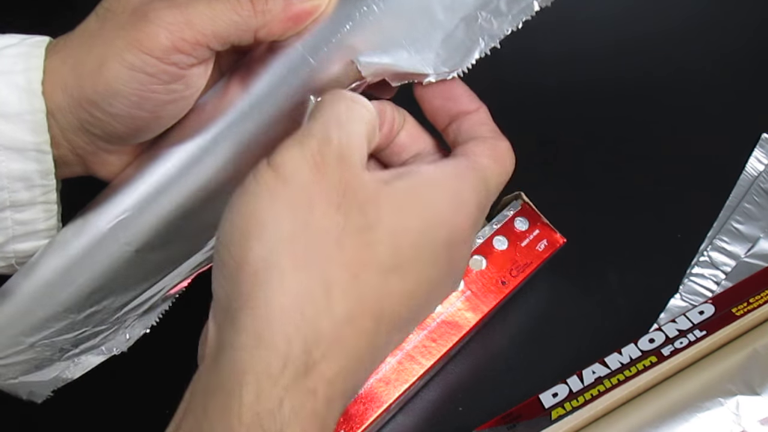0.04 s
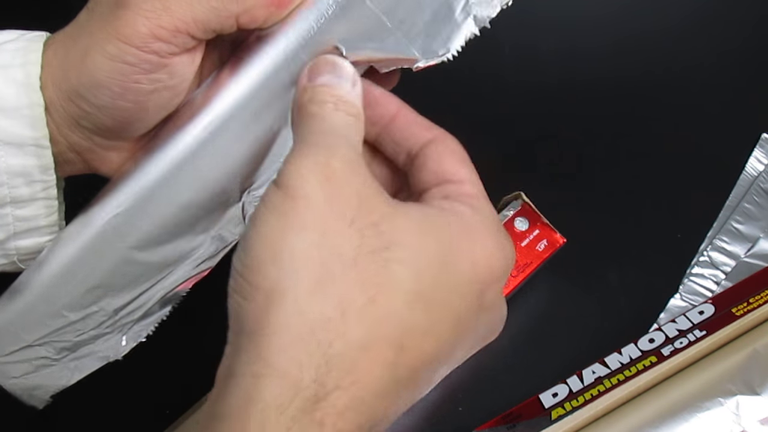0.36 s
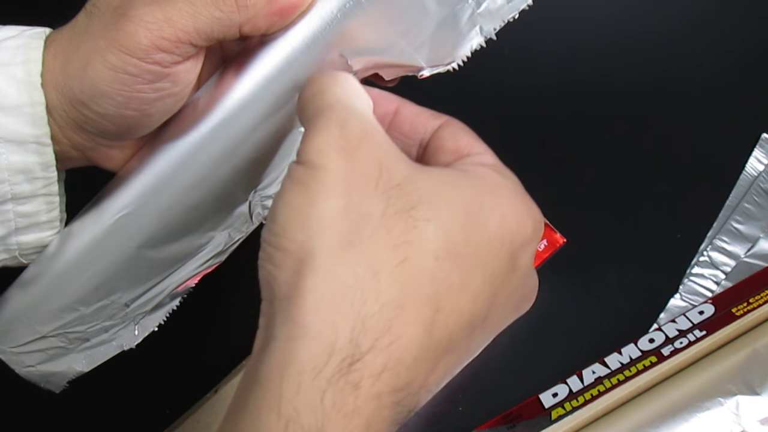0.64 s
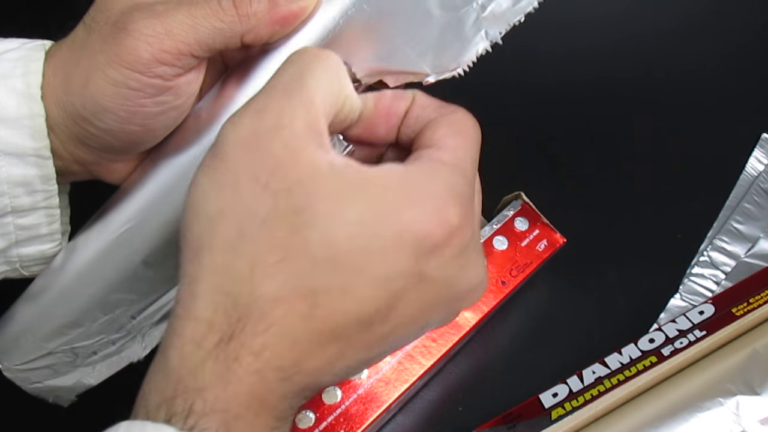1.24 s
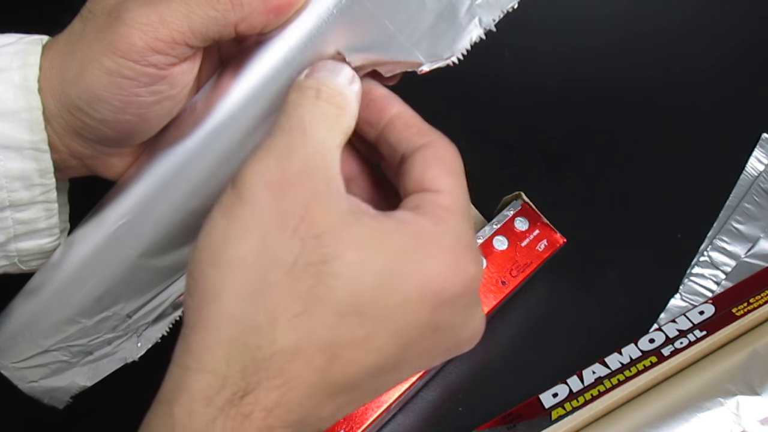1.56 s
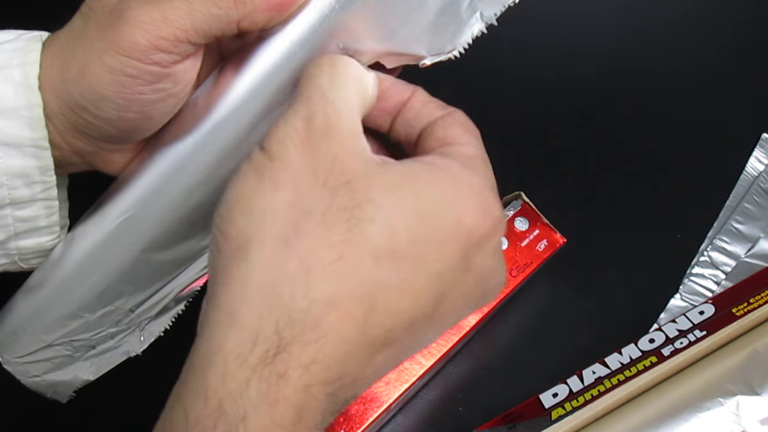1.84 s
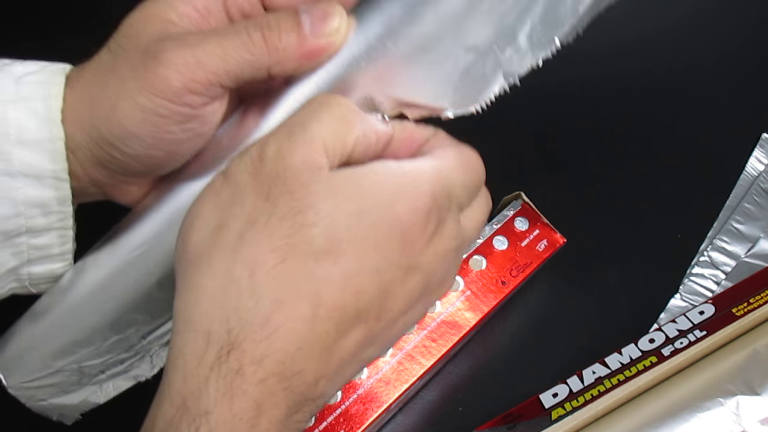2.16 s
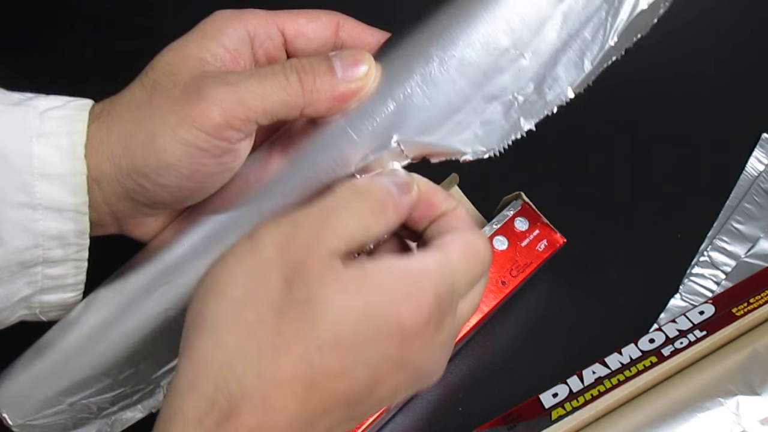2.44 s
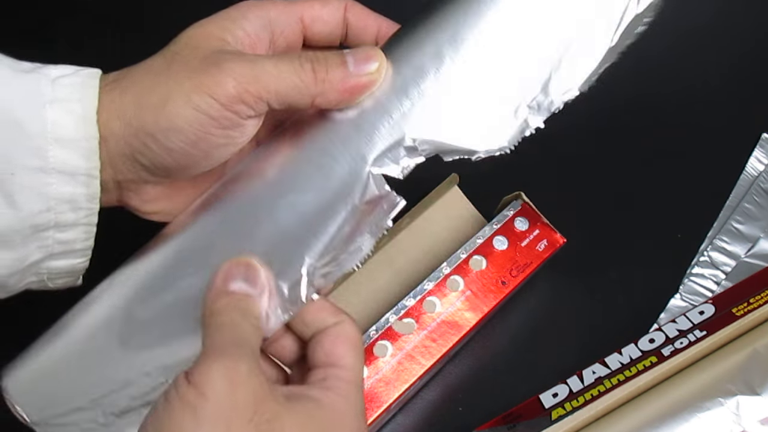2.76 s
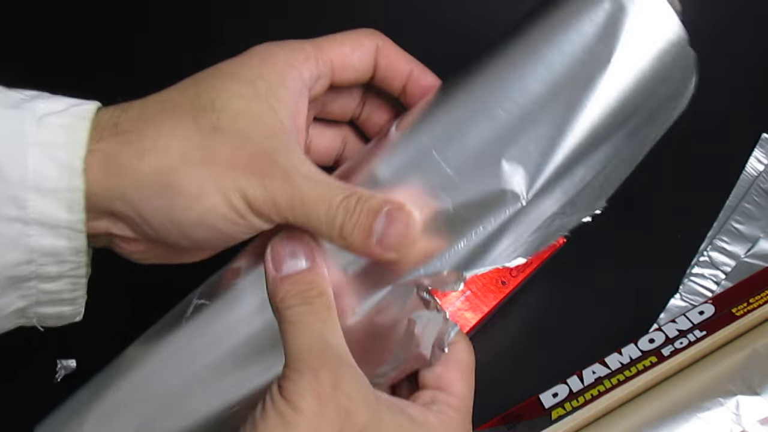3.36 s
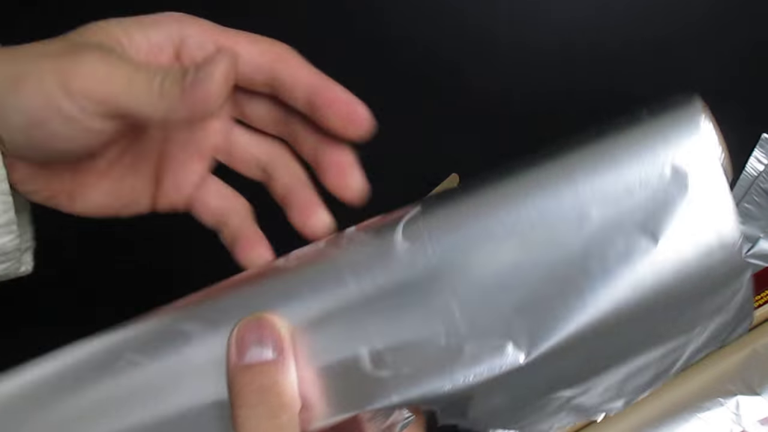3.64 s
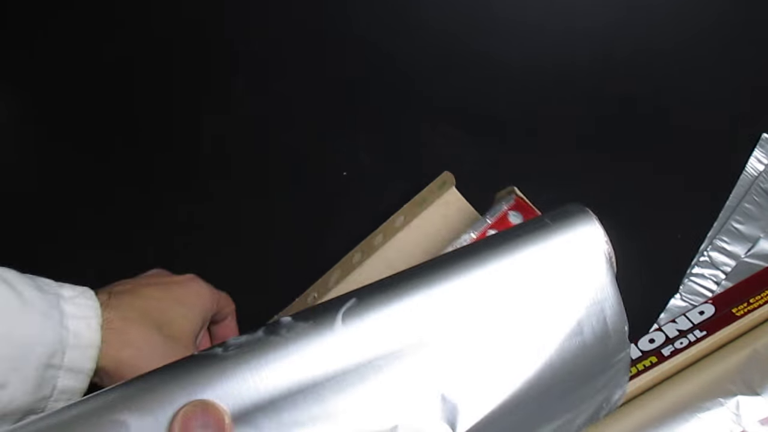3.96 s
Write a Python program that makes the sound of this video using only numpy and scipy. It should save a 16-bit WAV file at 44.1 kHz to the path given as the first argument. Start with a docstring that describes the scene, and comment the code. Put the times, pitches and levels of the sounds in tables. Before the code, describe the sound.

Aluminium foil crackles lightly, then crunches as it peels off a roll, with equipment humming.

```python
"""A roll of aluminium foil, close to the microphone: fingers pick at its edge, then peel a length free.
Creases snap one at a time, each a crack with a short ring, then give way in crunching runs over the
rustle of the flexing sheet. Behind the foil, in the same small room, mains-powered equipment runs on:
a transformer hums and a motor buzzes over the steady rush of ventilation."""
import sys
import numpy as np
from scipy import signal
from scipy.fft import rfft, irfft, next_fast_len
from scipy.io import wavfile
from scipy.ndimage import map_coordinates

SR = 44100
rng = np.random.default_rng(int(sys.argv[2]) if len(sys.argv) > 2 else 0)


def wav_out(sig):
    """Save sig, one row per channel (or a flat mono array), as 16-bit PCM at SR to the path in sys.argv[1]."""
    wavfile.write(sys.argv[1], SR, np.round(np.clip(np.atleast_2d(sig).T, -1, 1) * 32767).astype(np.int16))


N = 176400

# Moving air and hiss in the room. Each row: frequency in Hz, relative spectral level in dB.
AIR_SPECTRUM = [(20, -27), (35, -2.5), (60, -3), (100, 0), (145, -3), (180, 0.5), (220, -4.5), (350, -5.5),
                (470, -11), (740, -13), (1100, -19), (1700, -25), (2400, -29.5), (3100, -30), (3800, -35),
                (4400, -37), (5500, -35), (6500, -41.5), (7500, -44.5), (8600, -38), (10200, -41),
                (10900, -50), (11900, -60), (12800, -57), (16000, -65)]
# The equipment's weaker tones. Each row: frequency in Hz, rms level in dB.
EQUIPMENT_TONES = [(59.2, -46.5), (88.4, -47), (188.2, -45.5), (239.5, -50.5), (375.5, -50), (572.8, -57),
                   (752.5, -54), (951.5, -57.5)]
# Resonances of the motor housing. Each row: centre in Hz, width in Hz, rms dB of a harmonic at the peak.
HOUSING_RESONANCES = [(1387, 164, -59), (1840, 23, -63), (1976, 310, -64.5), (2966, 27, -62.5),
                      (5160, 49, -70.5), (5550, 82, -66), (8530, 69, -70.5), (9240, 54, -85),
                      (11850, 260, -88)]
# The loose sheet flexing. Each row: time in seconds, level in dB.
FLEX_LEVELS = [(0, -50.5), (.14, -53.5), (.62, -61), (.7, -85), (2.15, -82), (2.47, -57), (2.511, -36.5),
               (2.56, -64), (2.74, -47), (2.77, -37), (2.83, -44.5), (2.9, -37.5), (3.0, -44.5),
               (3.13, -42), (3.2, -54.5), (3.36, -38), (3.41, -49), (3.53, -49), (3.58, -63), (3.9, -68),
               (3.96, -47.5)]
# Fingertips worrying the edge between the snaps. Each row: time in seconds, level in dB.
PICKING_LEVELS = [(0, -76), (.5, -69), (.93, -73), (1.1, -73), (1.33, -67), (1.6, -80), (2.3, -67),
                  (2.4, -72)]
# Single creases snapping. Each row: start in seconds, level in dB, ring pitch in Hz,
# ring level over the crack in dB, treble tilt in dB per octave.
CREASE_SNAPS = [(.0285, -39, 5200, 1, 0), (0.1096, -36, 4700, -9, -2), (0.471, -41, 11200, -4, 4),
                (0.499, -45.5, 6540, -7, 1), (.564, -47, 6500, 1, 4), (.6374, -38, 3900, 0, 3.5),
                (0.8192, -35, 4700, -2.5, 5), (.872, -50, 4720, 6, 3), (.914, -50, 4850, 7, 3),
                (.9485, -41.5, 3570, 12, -1), (1.067, -52, 4740, 10, 2), (1.181, -53, 7500, -3, 1),
                (1.235, -56, 12500, -8, 4), (1.256, -44.5, 7500, -2, -1), (1.3405, -39, 1930, 1, -5.5),
                (1.3713, -47, 4730, -10, -1), (1.381, -52, 4730, -6, 3), (1.538, -49, 4200, -2, 5),
                (2.2148, -42, 5200, -4, -0.5), (2.2898, -37, 4450, -13, 2), (2.4628, -49, 4970, -10, 5),
                (2.4848, -31, 4840, -13, 2), (2.5128, -30.5, 6600, 0, 6), (2.5155, -30.5, 4500, 12, -4),
                (2.711, -45, 5000, -10, 3), (2.7557, -33, 6370, 4, 3), (2.8022, -33.5, 6300, -5, 4),
                (2.8455, -36, 4500, -9, -7), (2.8634, -33.5, 3630, -5, -1), (2.907, -34, 10900, -7, 6),
                (2.933, -30.5, 6500, -14, 4), (3.0224, -32.5, 6900, 0, 5), (3.0882, -30, 5230, -16, -3),
                (3.1484, -35, 4540, -11, 2), (3.223, -37, 4270, -10, -5), (3.257, -35.5, 3370, -2, 0),
                (3.2825, -40, 3310, -10, -1), (3.3039, -26.5, 5200, -12, 0.5), (3.3492, -30, 3020, 2, 0),
                (3.5186, -33, 4700, -10, -2), (3.647, -37, 4870, -14, -3), (3.7783, -31.5, 4280, -6, -6.5)]
# Runs of creases giving way together. Each row: start in seconds, level in dB, rise in seconds,
# seconds to fall 60 dB, treble tilt in dB per octave.
CRUNCH_RUNS = [(.045, -43, 0.0057, 0.11, -6), (0.077, -44, 0.005, .25, -3.5), (.111, -51, .0032, .15, 4),
               (.273, -54, 0.0049, .4, -2.5), (2.487, -39.5, .004, 0.14, 2.5),
               (2.505, -37, 0.0048, 0.06, 1), (2.654, -39.5, .003, 0.07, 4.5),
               (2.7506, -33.5, 0.0046, 0.24, 1), (2.803, -42, 0.0023, 0.075, 1),
               (2.865, -34, .005, 0.065, -1.5), (2.925, -32.5, 0.0082, .06, -1.5),
               (2.957, -38.5, 0.0041, 0.17, -1), (2.986, -42, .003, .15, -4.5),
               (3.019, -34.5, 0.0054, 0.33, -0.5), (3.077, -35.5, 0.0085, 0.27, -1.5),
               (3.152, -37.5, .0046, .1, -3.5), (3.304, -48, .003, 0.17, .5), (3.324, -43, .003, .1, 5),
               (3.348, -42, 0.0033, 0.12, 3), (3.418, -44, .005, 0.075, 0), (3.454, -44, .005, 0.068, -2.5),
               (3.482, -43, 0.0046, 0.13, -4), (3.518, -34.5, 0.0033, 0.13, -3.5)]
# The foil's tone as it flexes, cracks and crunches. Each row: frequency in Hz, relative level in dB.
SHEET_SPECTRUM = [(150, 13), (600, -8), (1050, 15.5), (1200, 7), (1440, 15), (1750, 5.5), (3100, 1.5),
                  (6500, -4.5), (11000, -13.5), (13000, -29), (16000, -35)]
CRACK_SPECTRUM = [(200, -14), (700, 2), (1300, -5), (2300, 1.5), (4500, 3), (7500, 0), (11500, -8),
                  (13000, -15), (16000, -30)]
CRUNCH_SPECTRUM = [(200, -6), (700, -6.5), (1100, 0), (1400, 0), (1750, -6.5), (4600, 0), (7500, -5),
                   (11500, -8.5), (13000, -15.5), (16000, -38)]
# Resonances of the pinched corner, until it comes free. Each row: centre in Hz, width in Hz, lift in dB.
CORNER_RESONANCES = [(4600, 470, 2.5), (6600, 170, 1), (10800, 2900, 3.5)]
# The recorder's narrow notch filters. Each row: centre in Hz, width in Hz.
RECORDER_NOTCHES = [(3945, 140), (7850, 89)]

SHIMMER_T60_S, TOP_HZ = .03, 15800


def amp(db):
    """Decibels to gain."""
    return 10 ** (np.asarray(db) / 20)


def unit(x):
    """Scale to rms 1."""
    return x / np.sqrt(np.mean(x ** 2) + 1e-20)


def along(points, hz):
    """(Hz, value) points read on a log axis."""
    f, v = np.transpose(points)
    return np.interp(np.log(hz + 1), np.log(f + 1), v)


def peak(hz, centre, width):
    """A resonance's bell curve, 1 at its centre."""
    return 1 / (1 + (2 * (hz - centre) / width) ** 2)


def wobble(rate):
    """A smooth random curve, rate knots a second."""
    return map_coordinates(rng.standard_normal(int(N * rate / SR) + 4), [np.arange(N) * rate / SR])


def filtered(x, response):
    """x through a filter given as a function of frequency."""
    size = next_fast_len(len(x) + SR // 10)
    return irfft(rfft(x, size) * response(np.fft.rfftfreq(size, 1 / SR)), size)[:len(x)]


def coloured(x, spectrum, tilt_db=0, lift_db=0, size=1024):
    """x through a unit-energy filter: the spectrum, tilted by tilt_db per octave and lifted per bin."""
    hz = np.fft.rfftfreq(size, 1 / SR)
    octaves = np.log2(np.maximum(hz, spectrum[2][0]))  # the tilt starts at the spectrum's third point
    cepstrum = irfft(np.log(amp(along(spectrum, hz) + lift_db + tilt_db * octaves)))
    cepstrum[1:size // 2] *= 2  # minimum phase keeps attacks sharp
    cepstrum[size // 2 + 1:] = 0
    kernel = irfft(np.exp(rfft(cepstrum)))
    return signal.fftconvolve(x, kernel / np.linalg.norm(kernel))[:len(x)]


def fade(t, t60):
    """Exponential decay that loses 60 dB in t60."""
    return np.exp(-np.log(1000) * t / max(t60, 1e-4))


def add(track, start, sound):
    """Mix a sound into the track at start seconds."""
    part = track[max(round(start * SR), 0):][:len(sound)]
    part += sound[:len(part)]


def ventilation(level_db=-35.5, sway_db=.5):
    """Moving air fills the room with an even rush, swaying slightly in level."""
    rush = unit(filtered(rng.standard_normal(N), lambda hz: amp(along(AIR_SPECTRUM, hz))))
    return amp(level_db + sway_db * wobble(4.07)) * rush


def transformer_hum(hum_hz=119.9, hum_db=-27.5, waver_rad=.52):
    """A transformer hums steadily in the background, among weaker tones that waver in phase."""
    turn = 2 * np.pi * np.arange(N) / SR
    tones = sum(amp(db) * np.sin(hz * turn + rng.uniform(0, 2 * np.pi) + waver_rad * wobble(6.07))
                for hz, db in EQUIPMENT_TONES)
    return np.sqrt(2) * (amp(hum_db) * np.sin(hum_hz * turn) + tones)


def motor_buzz(turning_hz=59.32, waver_hz=.0284, size=4096):
    """A motor buzzes on harmonics of its turning rate, shaped by the resonances of its housing."""
    hz = turning_hz * np.arange(size // 2 + 1)
    gain = sum(amp(db) * peak(hz, centre, width) for centre, width, db in HOUSING_RESONANCES)
    harmonics = gain * (hz < TOP_HZ) * np.exp(2j * np.pi * rng.random(len(hz)))
    cycle = irfft(harmonics) * size / np.sqrt(2)
    turns = np.cumsum(turning_hz + waver_hz * wobble(3.15)) / SR
    return np.interp(turns % 1 * size, np.arange(size), cycle)


def buckling(samples, per_s=550, spread_db=3.5, shimmer_db=-5):
    """Tiny buckles at random moments and of random size over the sheet's shimmer; rms 1."""
    sizes = amp(spread_db * np.clip(rng.standard_normal(samples), -2, 2))
    signs = rng.choice([-1, 1], samples)
    buckles = sizes * signs * (rng.random(samples) < per_s / SR)
    return unit(unit(buckles) + amp(shimmer_db) * rng.standard_normal(samples))


def sheet_rustle():
    """The loose sheet crackles softly for as long as it bends."""
    bending = amp(np.interp(np.arange(N) / SR, *np.transpose(FLEX_LEVELS)))
    return coloured(bending * buckling(N), SHEET_SPECTRUM)


def finger_picking(per_s=70):
    """Fingertips at the edge of the roll set off faint, bright ticks."""
    touches = rng.standard_normal(N) * (rng.random(N) < per_s / SR)
    t = np.arange(SR // 20) / SR
    shimmer = rng.standard_normal(len(t)) * fade(t, SHIMMER_T60_S)
    ticks = signal.fftconvolve(touches, shimmer)[:N]
    pressure = amp(np.interp(np.arange(N) / SR, *np.transpose(PICKING_LEVELS)))
    return pressure * unit(coloured(ticks, CRACK_SPECTRUM, tilt_db=4.5))


def foil_resonances(start, depth_db=3.2, step_hz=330, corner_free_s=2.7, size=1024):
    """Lift in dB per bin: the foil's uneven shape, new each time, plus the corner while it is pinched."""
    hz = np.fft.rfftfreq(size, 1 / SR)
    bumps = map_coordinates(rng.standard_normal(len(hz)), [hz / step_hz])
    treble = np.minimum(hz / (10 * step_hz), 1)
    corner = sum(db * peak(hz, centre, width) for centre, width, db in CORNER_RESONANCES)
    return depth_db * bumps * treble + corner * (start < corner_free_s)


def crease_snaps(crack_db=-9, modes=7, ring_spread=.075, ring_t60_s=.045):
    """Each crease snaps with a sharp crack, a short shimmer of the sheet and a ring of close modes."""
    out, t = np.zeros(N), np.arange(SR // 10) / SR
    for start, db, ring_hz, ring_db, tilt_db in CREASE_SNAPS:
        shimmer = rng.standard_normal(len(t)) * fade(t, SHIMMER_T60_S)
        burst = unit(shimmer) + amp(crack_db) * unit(1.0 * (t == 0))
        body = coloured(burst, CRACK_SPECTRUM, tilt_db, foil_resonances(start))
        offsets = np.linspace(-1, 1, modes) + rng.normal(0, 1 / modes, modes)
        mode_hz = ring_hz * (1 + ring_spread * offsets)
        phases = 2 * np.pi * (np.outer(t, mode_hz) + rng.random(modes))
        ring = np.sin(phases).sum(axis=1) * fade(t, ring_t60_s)
        snap = unit(unit(body) + amp(ring_db) * unit(ring))
        add(out, start, amp(db) * snap * shimmer.std())
    return out


def crunches(folds=2):
    """A run of buckles, on two folds at once, swells quickly and dies away as the foil gives."""
    out, t = np.zeros(N), np.arange(SR // 4) / SR
    for start, db, rise, t60, tilt_db in CRUNCH_RUNS:
        envelope = np.minimum(t / rise, 1) * fade(np.maximum(t - rise, 0), t60)
        run = sum(coloured(envelope * buckling(len(t)), CRUNCH_SPECTRUM, tilt_db, foil_resonances(start))
                  for _ in range(folds))
        add(out, start, amp(db) * run * np.linalg.norm(envelope) / np.linalg.norm(run))
    return out


def small_room(direct, level_db=-13, t60_s=.16, delay_s=.004):
    """The near walls return a short, faint tail to the microphone."""
    t = np.arange(SR // 3) / SR
    tail = rng.standard_normal(len(t)) * fade(t, t60_s) * (t > delay_s)
    return amp(level_db) * signal.fftconvolve(direct, tail / np.linalg.norm(tail))[:N]


def scene():
    """One microphone in a small room: the foil close up, the equipment behind it."""
    background = ventilation() + transformer_hum() + motor_buzz()
    foil = crease_snaps() + crunches() + sheet_rustle() + finger_picking()
    return (background + foil + small_room(foil))[None]


def record(dry):
    """The recorder notches out two narrow bands and keeps nothing above its band limit."""
    def response(hz):
        notches = [(centre ** 2 - hz ** 2) / (centre ** 2 - hz ** 2 + 1j * hz * width)
                   for centre, width in RECORDER_NOTCHES]
        return np.prod(notches, axis=0) * (hz < TOP_HZ)
    return filtered(dry[0], response)[None]


dry = scene()
out = record(dry)
wav_out(out)
```